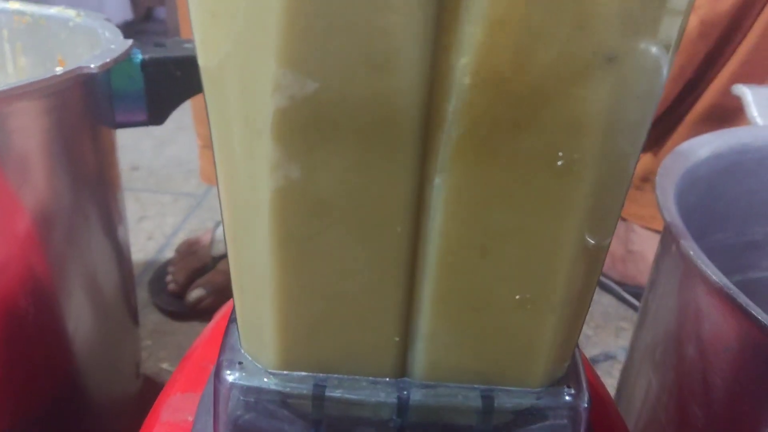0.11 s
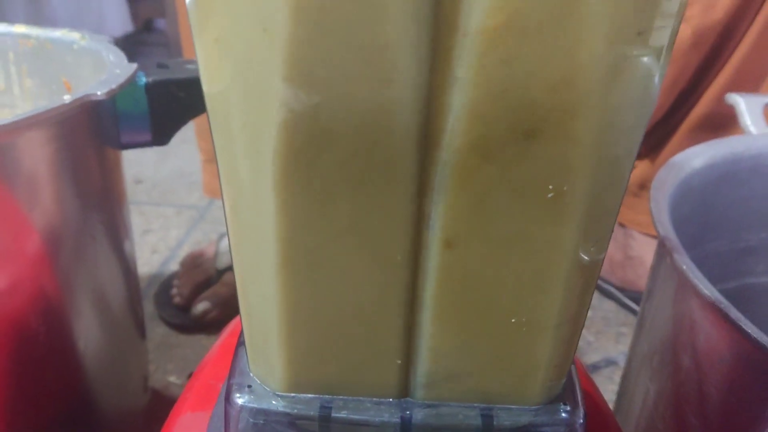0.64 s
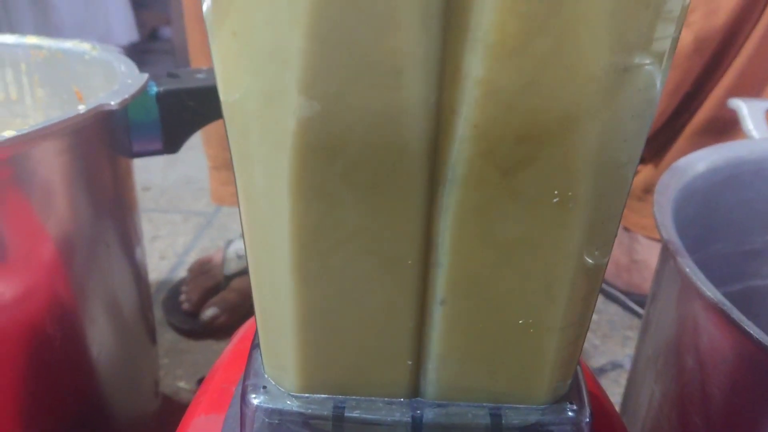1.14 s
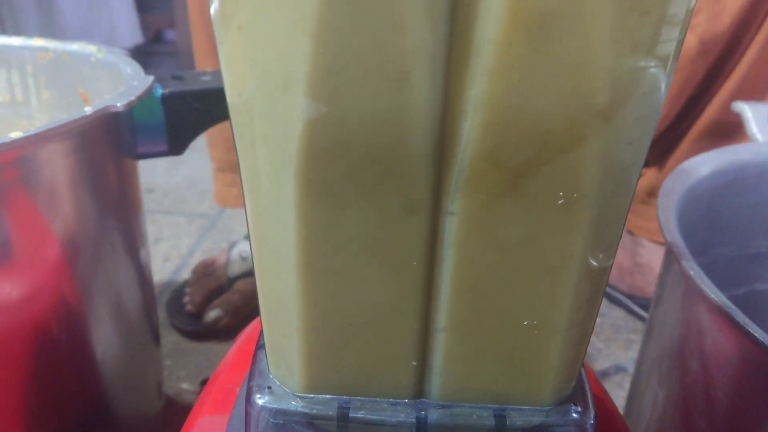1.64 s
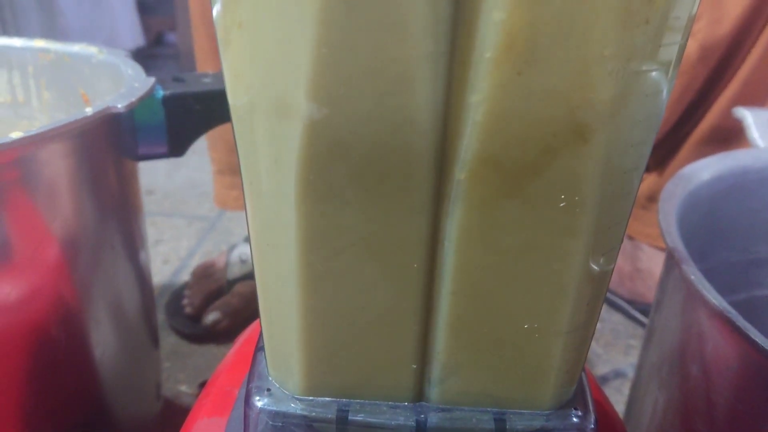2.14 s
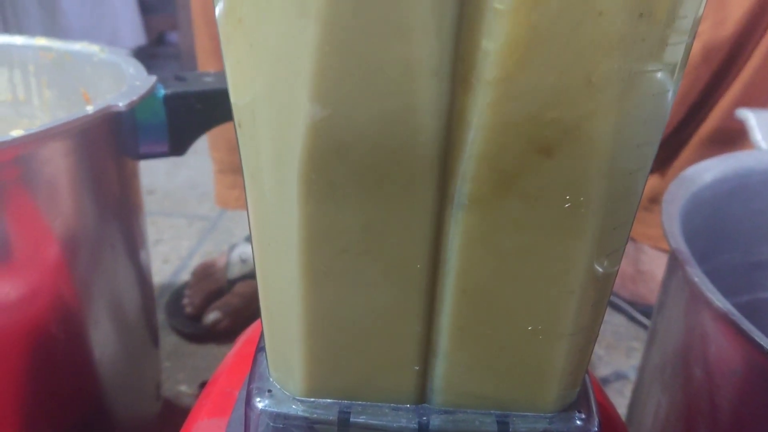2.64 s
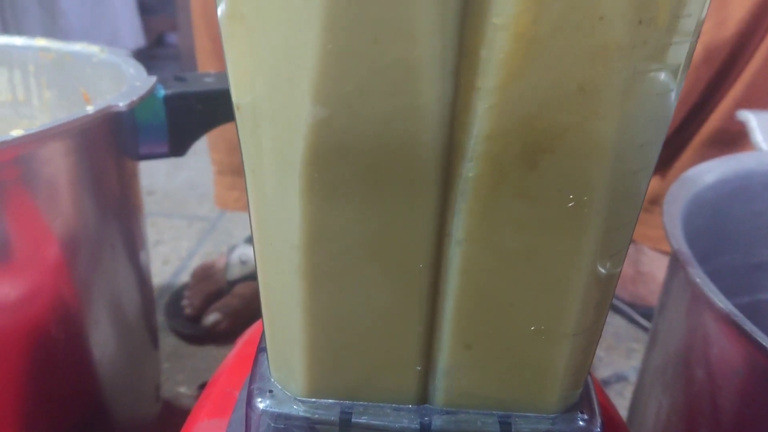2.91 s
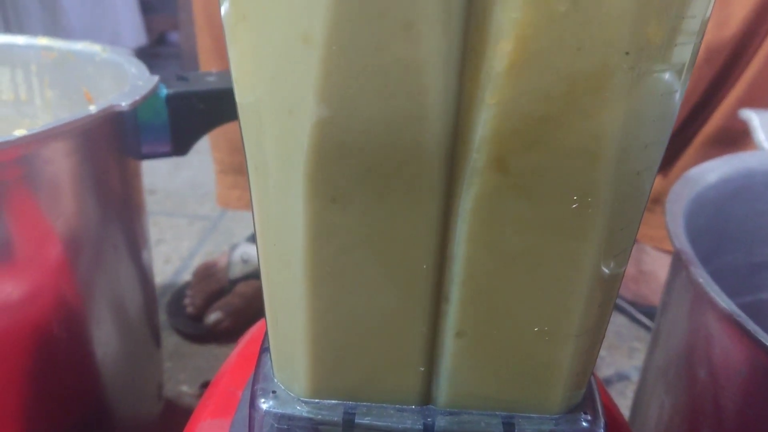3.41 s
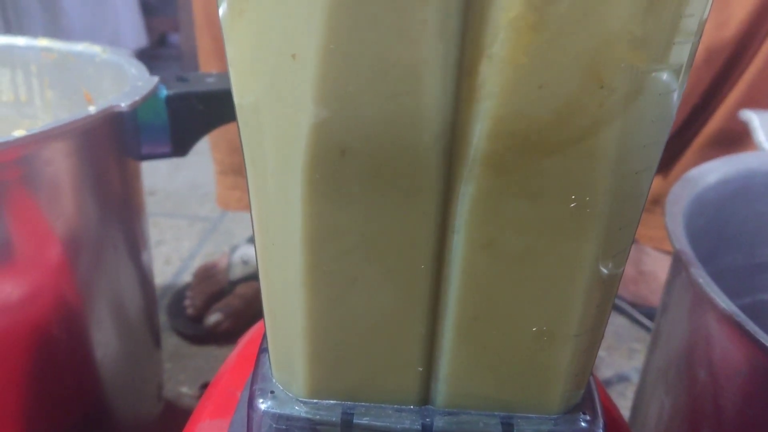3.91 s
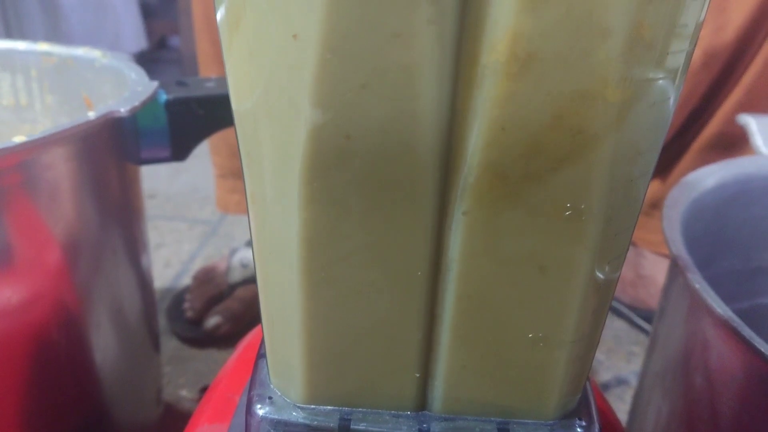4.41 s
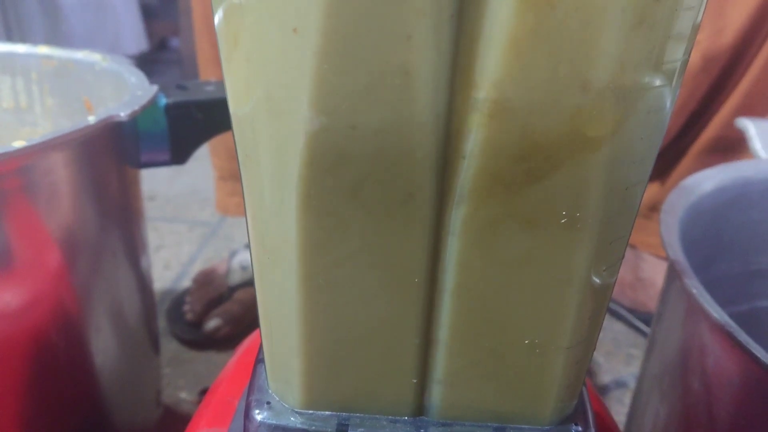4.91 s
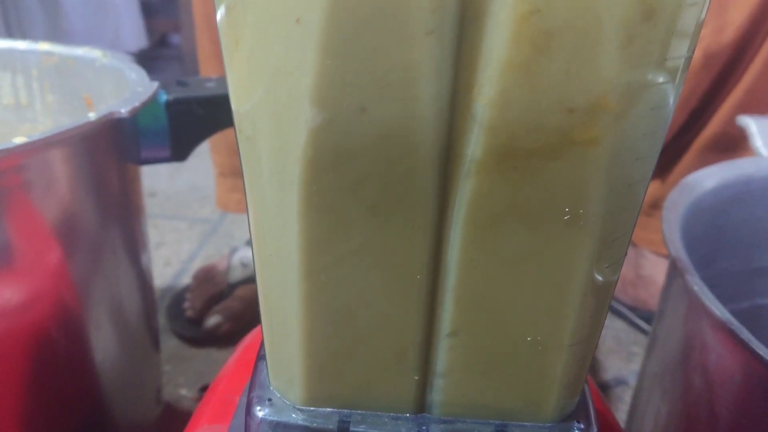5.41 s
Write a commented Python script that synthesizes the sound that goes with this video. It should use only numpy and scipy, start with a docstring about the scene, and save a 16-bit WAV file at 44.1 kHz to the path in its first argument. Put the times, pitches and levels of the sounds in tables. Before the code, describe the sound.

A blender is already running at full power, very close to a hand-held microphone. Its motor gives a strong, buzzing low hum with steady overtones and thin, faint high whines, all wavering slightly together as thick food loads the blades. Around it is a dense, rough, rushing roar of churning mixture, coloured by the hard plastic body, with a hollow mid-low boom from the jar and a deep rumble from the base. The churn is slightly louder in the first second, then settles. From about 1.5 to 5 seconds the treble gradually dulls as the food turns smoother. At about 5.1 seconds it is switched off: the whine quickly weakens, the pitch slides down and the roar sinks and becomes uneven, some brightness returning, until the sound stops near 5.5 seconds, before the blades come to rest. The left side is muffled, the right brighter. No other sounds are heard.

```python
"""A blender whines at nearly steady speed close to a hand-held camera, churning thick food in a lidded jar,
then is switched off and slows down. The whine is a set of sine tones locked to the turning shaft.
Around it roars the churn, noise coloured by the resonant body, with a jar boom and a rumble from the base.
The left microphone port is partly covered and hears most of the treble muffled."""
import sys
import numpy as np
from scipy import signal
from scipy.io import wavfile
from scipy.ndimage import uniform_filter1d, minimum_filter1d

SR = 44100
rng = np.random.default_rng(int(sys.argv[2]) if len(sys.argv) > 2 else 0)


def generate_wav(sig):
    """Save sig (samples, or channels by samples) to the path in sys.argv[1] as 16-bit PCM at SR."""
    pcm = np.round(np.clip(np.atleast_2d(sig).T, -1, 1) * 32767).astype(np.int16)
    wavfile.write(sys.argv[1], SR, pcm)


N = 244314  # length in samples

# Shaft speed under power, sagging and racing as the food loads the blades.
# Each row: time in seconds, speed in turns a second (Hz), before smoothing and fine wander.
SHAFT_SPEED = [(0, 231.3), (0.27, 228.3), (0.52, 233.8), (0.84, 232), (0.98, 237.8), (1.1, 234.2),
               (1.36, 231.7), (1.56, 237), (1.8, 233), (1.94, 234), (2.17, 231), (2.4, 235.5), (2.6, 231.2),
               (2.73, 230.5), (2.95, 232), (3.16, 235.4), (3.36, 232.5), (3.68, 233.2), (3.98, 237.3),
               (4.24, 230.2), (4.5, 235.2), (4.72, 231.5), (4.95, 232), (5.12, 228)]
# The covered left port compared with the right.
# Each row: frequency in Hz, level in dB, likeness of the two sounds from 0 to 1, lag in radians.
LEFT_PORT = [(35, -7, .3, 1), (60, -1.5, 0.98, 0.5), (161, -2, 0.95, 0), (232, -3, 0.85, 0.2),
             (332, -4.5, 0.96, 0.36), (500, -3, 0.89, .5), (774, -5.5, 0.91, .5), (1070, -8.5, 0.5, 0.6),
             (1840, -13.5, 0.84, 0.5), (2170, -8.5, 0.1, -8), (2390, -21.5, 1, -1), (3030, -20.5, 0.6, -6),
             (4200, -21, 0.2, -4.5), (6360, -29.5, 0.2, -2), (7200, -42, .1, -9), (7540, -34, .1, -9),
             (8000, -21, 0, 2), (8500, -21, .1, -7), (9300, -8.5, 0.4, -8), (11500, -5, 0.2, -4.5),
             (11900, -19, .1, -7), (12300, -27, .1, -4), (13000, -56, .1, 0)]
FULL_HZ = 233  # shaft speed that counts as full, turns a second
OFF_S, COAST_S = 5.135, 0.46  # moment of switching off; time constant of the dying speed, seconds
CUT_S = 0.066  # time constant of the other changes after switching off, seconds


def gain_of(db):
    """Turns decibels into a factor for the waveform."""
    return 10 ** (np.asarray(db) / 20)


def evened(x):
    """Scales the sound so that the mean of both channels has unit rms."""
    middle = np.atleast_2d(x).mean(0)
    return x / np.sqrt(np.mean(middle ** 2) + 1e-20)


def read(points, hz):
    """Reads each column of a table at the given frequencies, on a log scale."""
    f, *columns = np.transpose(points)
    return [np.interp(np.log(hz + 1), np.log(f + 1), c) for c in columns]


def curve(rows, t):
    """Reads each column of a table at the given times."""
    s, *columns = np.transpose(rows)
    return [np.interp(t, s, c) for c in columns]


def wander(rate_hz):
    """Slow random drift of unit size: random steps, averaged over 1 / rate_hz seconds."""
    steps = rng.standard_normal(N // 64 + 2)  # one step every 64 samples
    steps = uniform_filter1d(steps, max(round(SR / 64 / rate_hz), 1))
    return np.interp(np.arange(N) / 64, np.arange(len(steps)), steps / steps.std())


def since_off(t):
    """Seconds since the current was cut, zero before that."""
    return np.maximum(t - OFF_S, 0)


def cut_share(t):
    """Rises quickly from 0 towards 1 once the current is cut."""
    return 1 - np.exp(-since_off(t) / CUT_S)


def shaft_speed(t):
    """Turns a second: the powered speed, which dies away exponentially after switching off."""
    powered_hz = curve(SHAFT_SPEED, t)[0]
    shaft_hz = powered_hz * np.exp(-since_off(t) / COAST_S)
    tugs_hz = 0.681 * wander(rate_hz=30.)  # lumps of food tug at the blades
    return uniform_filter1d(shaft_hz, 1500) + tugs_hz


def motor(shaft_hz, turns):
    """Sines at multiples of the shaft speed, each wavering on its own; imbalance shakes once a turn."""
    # Other tones locked to the shaft, from blades, fan and bearing, as multiples of its speed.
    multiples = [.5, 2, 3, 4, 5, 6, 7, 10, 14.27, 15.46, 17.6, 18, 18.3, 18.68, 19.5, 20.85, 22, 23.15]
    # One row for each multiple: level at full speed in dB, waver in dB.
    tone_levels = [(-43, 5.5), (-28, 1.07), (-25, 0.5), (-39.5, 4), (-39.5, 1), (-48, 3), (-42.5, 4),
                   (-39, 4), (-37, 2), (-47, 2.5), (-48.5, 6.5), (-37.5, -1.5), (-51, -2), (-41.5, 1.5),
                   (-50.5, 2), (-48, 4.5), (-47, 2), (-50, 5)]
    # How well the housing radiates the once- and twice-a-turn tones as they sweep through it.
    # Each row: frequency in Hz, response in dB; only differences from full speed count.
    housing = [(92, -19), (122, -25), (144, -18), (158, -6), (172, -19), (184, -19), (202, -7), (221, -5),
               (250, 2), (278, -13), (306, -11), (360, -27), (405, -10.5), (470, -10)]
    imbalance = (-11.5, 0.4)  # once-a-turn tone: level at full speed in dB, waver in dB
    surge_db_per_hz_s = 0.0222  # low tones swell while the shaft gathers speed, dB for each Hz a second
    cut_db = -18  # the other tones lose their drive this far

    out = np.zeros((2, N))
    t = np.arange(N) / SR
    force_db = 2 * 20 * np.log10(shaft_hz / FULL_HZ)  # shaking force goes with the square of the speed
    speeding_up = np.gradient(curve(SHAFT_SPEED, t)[0]) * SR
    surge_db = surge_db_per_hz_s * uniform_filter1d(speeding_up, size=8000)
    for k, (db, waver_db) in zip([1] + multiples, [imbalance] + tone_levels):
        drive_db = cut_db * cut_share(t)
        if k in (1, 2):
            radiated_db = read(housing, k * shaft_hz)[0] - read(housing, k * FULL_HZ)[0]
            drive_db = force_db + radiated_db + surge_db
        level_db = db + drive_db + waver_db * wander(rate_hz=23.0)
        left_db, same, lag = read(LEFT_PORT, k * shaft_hz)
        left = np.clip(same, 0, 1) ** .3 * gain_of(left_db)  # unlike ports weaken the left tone
        angle = 2 * np.pi * (k * turns + rng.random())
        pair = np.array([left * np.sin(angle - lag), np.sin(angle)])
        pair *= 2 / (1 + left)  # the level belongs to the average of the two ports
        out += np.sqrt(2) * gain_of(level_db) * pair
    return out


def roar(shape_db, patchy_db, flicker_db):
    """Noise at both ports with drifting patches, built frame by frame; shape_db(hz, t) colours it."""
    size, hop = 4096, 1024  # frame length and step, samples
    frames, hz = N // hop + 5, np.fft.rfftfreq(size, 1 / SR)[:, None]
    a, b, c, d, patches = rng.standard_normal((frames, size // 2 + 1, 5)).T
    patches = uniform_filter1d(patches, size=48, axis=0)  # across frequency
    patches = uniform_filter1d(patches, size=2, axis=1)  # across time
    flicker = rng.standard_normal(frames)  # moves all frequencies together
    left_db, same, lag = read(LEFT_PORT, hz)
    same = np.clip(same, 0, 1)
    right = a + 1j * b
    shared = same * np.exp(-1j * lag) * right
    separate = np.sqrt(1 - same ** 2) * (c + 1j * d)
    left = gain_of(left_db) * (shared + separate)
    field_db = shape_db(hz, np.arange(frames) * hop / SR)
    field_db = field_db + patchy_db * patches / patches.std() + flicker_db * flicker
    spectrum = np.array([left, right]) * gain_of(field_db)
    noise = signal.istft(spectrum, nperseg=size, noverlap=size - hop)[1]
    return evened(noise[:, :N])


def body_db(hz):
    """Lift in dB that the resonances of motor housing, jar and lid give at each frequency."""
    # Each row: frequency in Hz, width in Hz, lift over the churn in dB.
    body = [(275, 16, 2.5), (362.5, 27, 5.5), (408, 29, 6.5), (530, 52, 2.5), (590, 20, 1), (1019, 97, 5),
            (1161, 69, 4), (1404, 33, 6.5), (1668, 57, 7), (1430, 28, 1), (1803, 113, 9.5), (1850, 21, 2.5),
            (1970, 89, 6), (2415, 120, 6.5), (2540, 87, 4), (3120, 120, 2), (3280, 58, 2.5),
            (4160, 92, 6.5), (4660, 60, 3), (4810, 170, 6), (5080, 78, 5.5), (5330, 53, 2.5),
            (5840, 190, 2.5), (6650, 300, 8.5), (9640, 150, 1.5), (14000, 500, 8)]
    return sum(db / (1 + (2 * (hz - f) / w) ** 2) for f, w, db in body)


def churn(turns):
    """Food thrown about by the blades, heard through the body; it throbs a little once a turn."""
    # Churn between the resonances at the open port. Each row: frequency in Hz, relative level in dB per Hz.
    churn_colour = [(35, -34), (100, -13.5), (270, -3.5), (330, -6.5), (440, -5.5), (600, -3), (1200, -3),
                    (2150, -6.5), (3000, -4.5), (3900, -7), (5600, -10.5), (6150, -14), (6900, -21.5),
                    (7400, -27.5), (7620, -30.5), (7720, -53), (7850, -43), (8250, -30), (8900, -21),
                    (10700, -26), (13000, -28), (14400, -30), (16000, -35)]
    # Treble dulls as the food turns smooth, and partly returns at the end.
    # Each row: time in seconds, treble change in dB before each frequency takes its share.
    dulling = [(0, -1), (1.5, -1), (3.9, -5), (4.3, -7), (5.15, -8.5), (5.54, -3)]
    # How much of that change each frequency follows. Each row: frequency in Hz, share from 0 to 1.
    dull_share = [(3000, 0), (5500, 0.55), (9500, 0.04), (13000, 0.8)]

    def shape_db(hz, t):
        """Colour of the churn as it dulls."""
        dull_db = read(dull_share, hz)[0] * curve(dulling, t)[0]
        return read(churn_colour, hz)[0] + body_db(hz) + dull_db

    throb = 1 + 0.098 * np.cos(2 * np.pi * turns)
    return roar(shape_db, patchy_db=0.72, flicker_db=0.25) * throb


def food_load_db(t):
    """Extra churn level in dB from settling, from load on the shaft and from uneven strikes."""
    settle_db = 1 * np.exp(-t / 0.86)  # the churn starts 1 dB louder and settles over 0.86 s
    # a heavier load drags the shaft down and makes the churn grow, 0.2 dB for each Hz
    load_db = 0.2 * (FULL_HZ - curve(SHAFT_SPEED, t)[0])
    lumpy_db = 1.5 * cut_share(t) * wander(rate_hz=60.)  # coasting blades strike the food unevenly
    return settle_db + load_db + lumpy_db


def humps_db(modes, hz):
    """Sums the power of steep resonances and gives it in dB."""
    power = sum(gain_of(2 * db) / (1 + (2 * (hz - f) / w) ** 2) ** 2 for f, w, db in modes)
    return 10 * np.log10(power)


def jar_boom():
    """The air and walls of the jar boom: noise shaped by their resonances."""
    # Each row: frequency in Hz, width in Hz, relative level in dB.
    jar_modes = [(620, 69, -9), (692, 51, 0), (762.5, 57, 2), (814, 44, -7.5)]
    return roar(lambda hz, t: humps_db(jar_modes, hz), patchy_db=0.5, flicker_db=-0.34)


def base_rumble():
    """The base rumbles on the counter: noise shaped by low resonances."""
    # Each row: frequency in Hz, width in Hz, relative level in dB.
    base_modes = [(54, 14, -11.5), (93.5, 33, -7), (114, 18.5, 0.5), (156.7, 33, 0), (188, 20, -14)]
    return roar(lambda hz, t: humps_db(base_modes, hz), patchy_db=0.5, flicker_db=-0.5)


def scene():
    """Motor tones plus churn, jar boom and base rumble, all following the shaft speed."""
    # Rows are churn, jar boom and base rumble.
    # Each row: level at full speed in dB, power of the speed that it follows, slow swell in dB.
    noise_levels = [(-20.5, 1.16, -0.05), (-21.3, 0.4, 0.5), (-27, 0.44, 1.7)]
    t = np.arange(N) / SR
    shaft_hz = shaft_speed(t)
    turns = np.cumsum(shaft_hz) / SR
    out = motor(shaft_hz, turns)
    loaded_churn = churn(turns) * gain_of(food_load_db(t))
    layers = [loaded_churn, jar_boom(), base_rumble()]
    for layer, (db, power, swell_db) in zip(layers, noise_levels):
        level_db = db + swell_db * wander(rate_hz=4.)
        out += layer * (shaft_hz / FULL_HZ) ** power * gain_of(level_db)
    return out


def limiter(x):
    """Eases the gain down smoothly around the highest peaks, aiming to hold them at 0.94."""
    room = np.minimum(0.94 / (abs(x).max(0) + 1e-9), 1)
    ease = minimum_filter1d(room, size=401)
    ease = uniform_filter1d(uniform_filter1d(ease, size=200), size=200)
    return x * ease


def roll_off(x):
    """The treble ends steeply here."""
    return signal.sosfilt(signal.butter(12, 15760, fs=SR, output="sos"), x)


def record(dry):
    """Limits the peaks of the scene and returns the finished sound."""
    mix = limiter(dry)
    return roll_off(mix)


dry = scene()
out = record(dry)
generate_wav(out)
```